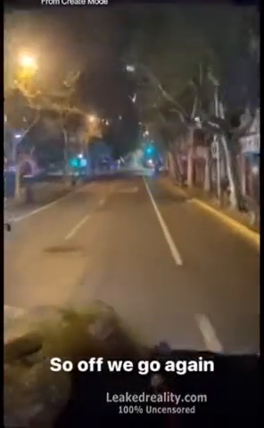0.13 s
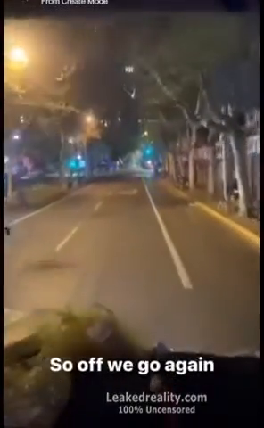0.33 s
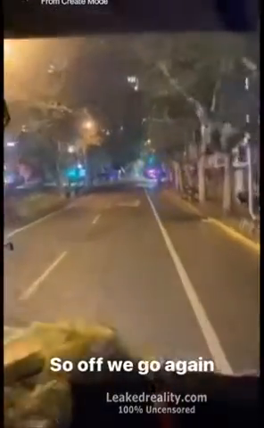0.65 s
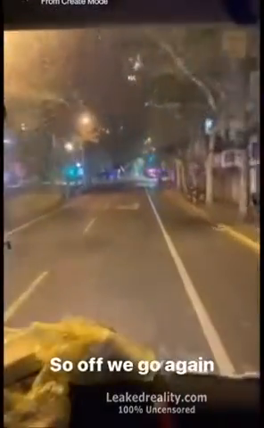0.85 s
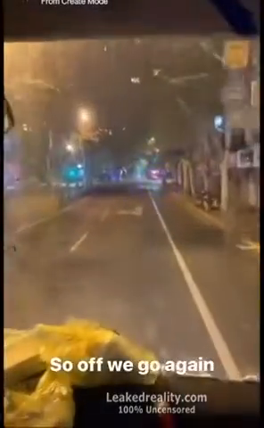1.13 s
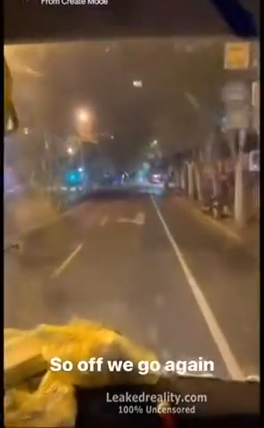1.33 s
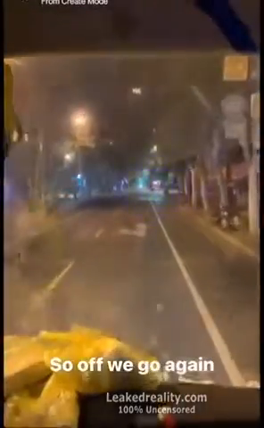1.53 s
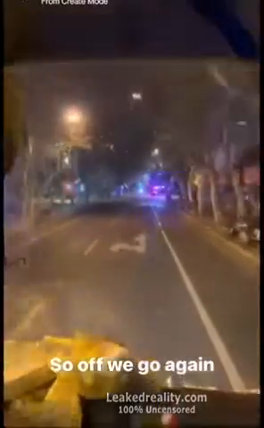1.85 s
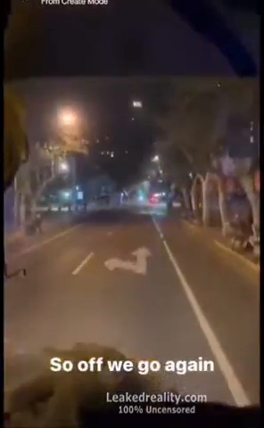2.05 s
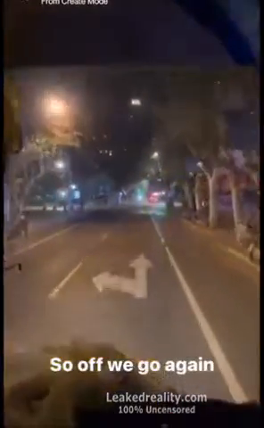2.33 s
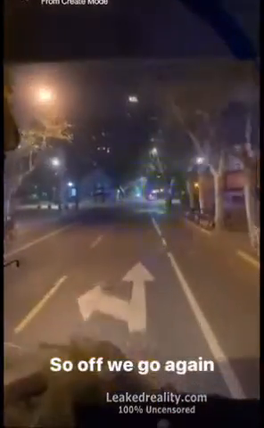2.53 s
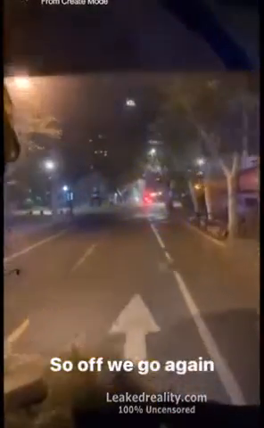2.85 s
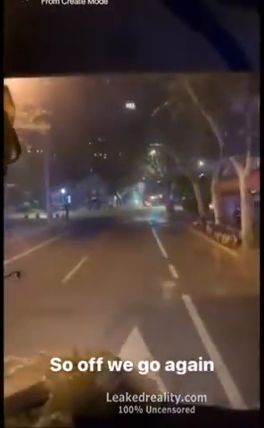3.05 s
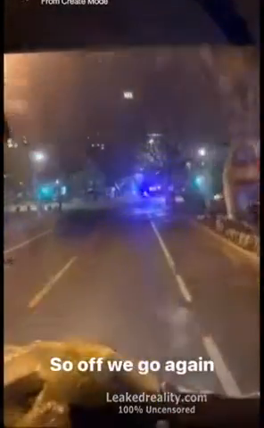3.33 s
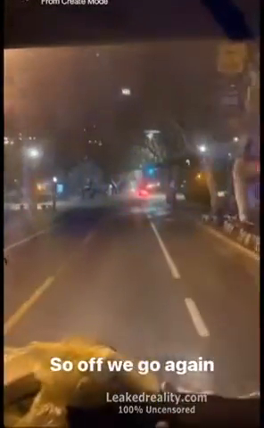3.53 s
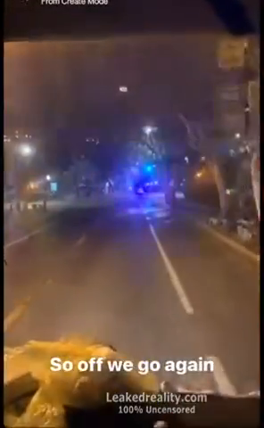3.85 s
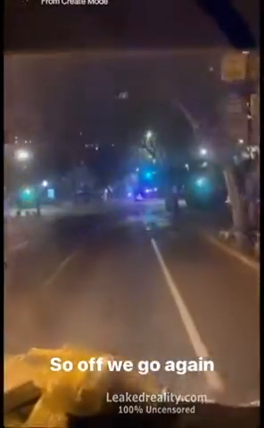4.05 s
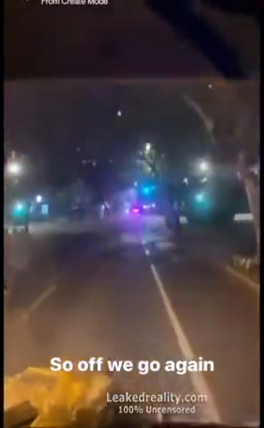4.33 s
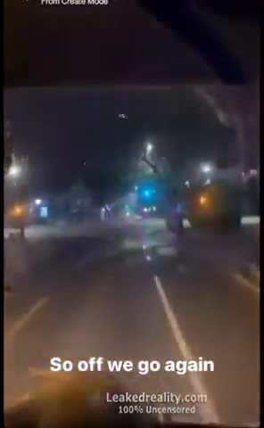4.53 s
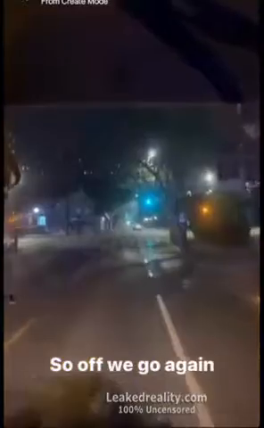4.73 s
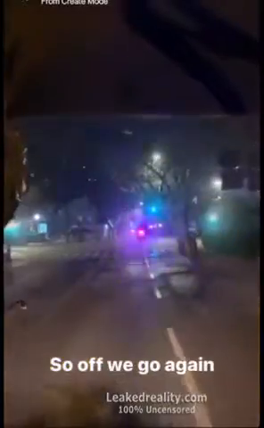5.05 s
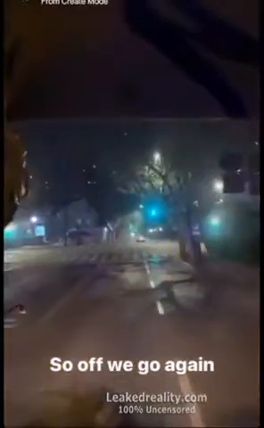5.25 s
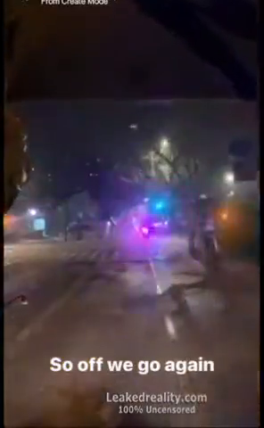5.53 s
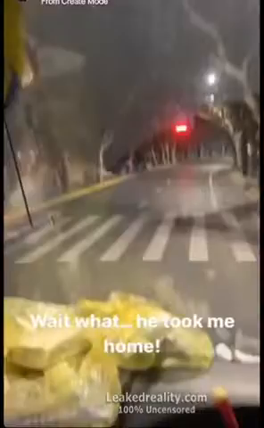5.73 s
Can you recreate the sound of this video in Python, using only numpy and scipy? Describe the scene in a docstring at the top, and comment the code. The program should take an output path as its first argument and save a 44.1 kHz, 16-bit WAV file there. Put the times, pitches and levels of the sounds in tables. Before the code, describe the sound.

A bus engine drones low under load, then eases off into steady road rumble, with loose panels chattering and sharp knocks inside.

```python
"""Inside a bus on a city street at night. At first the engine drones under load while the road rumbles
and fittings knock; then it eases off, and thin squeaks follow. Midway come more knocks and a swell of hum.
Booming bumps, a chattering panel, a wavering soft hiss and spurts of air run on until an abrupt stop.
Engine and hum are sine tones with noise-fed cabin resonances; road, hiss and air are coloured noise;
panels and fittings are struck or shaken resonances; squeaks are gliding partials.
"""
import sys
import numpy as np
from scipy import signal
from scipy.fft import rfft, irfft
from scipy.io import wavfile
from scipy.ndimage import uniform_filter1d

SR = 44100
rng = np.random.default_rng(int(sys.argv[2]) if len(sys.argv) > 2 else 0)


def transcribe(u):
    """Save the signal u as a 16-bit wav file named by the first command-line argument.

    u: samples, shape (n,) or (channels, n), limited to [-1, 1]; the rate is SR.
    q: integer samples, one column per channel.
    """
    v = np.clip(np.atleast_2d(u).T, -1, 1)
    q = np.round(v * 32767).astype(np.int16)
    wavfile.write(sys.argv[1], SR, q)


N = 260190
TIME = np.arange(N) / SR  # [s]

# Table levels are starting points: the sources add their own trims and wavering.
# Balance of the first four multiples of the firing rate: (level [dB])
ENGINE_ORDERS = [2, -27, -28, -31]
# Cabin resonances that growl with the engine: (frequency [Hz], width [Hz], level [dB])
CABIN_MODES = [(150.4, 11, 0), (179, 27, -2), (222, 14, 0), (253.6, 23, -4), (293, 14.4, -3),
               (326.6, 30, -10), (410, 27, -11), (449.4, 12, -4.5), (588, 42, -15.5)]
# Balance of the first four multiples of the hum's pitch: (level [dB])
HUM_ORDERS = [2, -5, -10, -18]
# Swell of the drive line's hum: (time [s], level [dB])
HUM_LEVEL = [(0, -38.5), (1.2, -42.5), (2.6, -51), (2.95, -33.5), (3.35, -39.5), (3.8, -46), (4.7, -46.5),
             (5.64, -41.5)]
# Roughness of the road, heard as tyre rumble: (time [s], level [dB])
ROAD_LEVEL = [(0.0, -31.5), (0.36, -32), (0.86, -35.5), (1.68, -31.5), (1.78, -36), (1.92, -31.5),
              (2.46, -36), (2.52, -37.5), (2.72, -32.5), (3.86, -33), (4.02, -32), (4.75, -36),
              (5.2, -34.5), (5.35, -34), (5.64, -34)]
# Shaking of the body panels: (time [s], level [dB])
SHAKING_LEVEL = [(0.0, -42), (0.54, -42.5), (0.6, -48.5), (0.66, -47), (1.26, -54), (1.62, -51),
                 (1.98, -52), (2.1, -53.5), (3.3, -51), (4.44, -52), (4.92, -49), (5.04, -53), (5.64, -51)]
# Relative spectra of sway, tyre rumble and body roar: (frequency [Hz], density [dB per Hz])
SWAY_COLOUR = [(10, -19.5), (17, -15), (24.5, 9), (32, -5), (43, -3.5), (55, -8), (80, -32)]
ROAD_COLOUR = [(35, -12.5), (55, -6.5), (70, 2.5), (100, -1.5), (150, -8), (200, -15), (260, -17),
               (350, -23), (600, -45)]
ROAR_COLOUR = [(100, -43.5), (200, 6), (300, 7.5), (450, 1), (540, 1), (900, -0.5), (1400, -6.5),
               (1800, -4.5), (2150, -14), (2800, -29.5), (5000, -63.5)]
# Bumps under the wheels:
# (time [s], length [s], boom level [dB], boom frequency [Hz], shudder level [dB])
BUMPS = [(.32, 0.034, -37, 84, -36), (0.625, 0.06, -28.5, 96, -35.5), (.975, 0.031, -36, 163, -42.5),
         (1.01, .04, -31.5, 90, -58), (2.731, 0.063, -36.5, 161, -44), (2.949, 0.057, -28.5, 45.5, -58),
         (3.272, 0.049, -22, 41.05, -55), (3.36, 0.15, -42, 130, -42), (4.051, 0.036, -35, 142.5, -52.5),
         (4.161, 0.08, -30.5, 82.2, -52), (4.412, 0.065, -23, 37.3, -63.5),
         (4.69, 0.045, -31.5, 102, -40.5)]
# Relative spectrum of the cabin's shudder: (frequency [Hz], density [dB per Hz])
SHUDDER_COLOUR = [(120, 2.5), (160, 1.5), (300, -1), (450, -11), (700, -24)]
# Chatters of loose panels:
# (time [s], length [s], rattle level [dB], ring level [dB], ring frequency [Hz], ring width [Hz])
CHATTERS = [(.138, 0.016, -45, -42, 1790, 200), (.2, 0.029, -54, -49, 1750, 250),
            (0.26, 0.032, -58, -41.5, 1160, 250), (0.533, 0.017, -48, -49, 1710, 250),
            (.69, 0.039, -56, -51, 760, 300), (1.012, 0.069, -51, -48.5, 1320, 350),
            (1.425, 0.018, -49.5, -49, 1840, 200), (1.492, 0.038, -52, -49, 1230, 500),
            (1.558, 0.015, -47.5, -36, 1825, 90.5), (1.582, .008, -63, -43, 1820, 120),
            (1.614, 0.04, -53, -49.5, 1790, 200), (1.978, 0.012, -46, -46.5, 1870, 150),
            (2.146, 0.023, -53.5, -58, 2870, 900), (2.37, 0.037, -54, -56, 1840, 200),
            (2.774, 0.024, -51, -43, 1855, 100), (2.92, 0.0093, -61, -49, 1880, 150),
            (3.119, 0.0083, -55, -50, 1800, 200), (3.333, 0.025, -47.5, -55, 1857, 250),
            (3.366, 0.025, -48, -51, 1580, 400), (3.417, 0.019, -46, -44.5, 1650, 400),
            (3.439, 0.0081, -53, -44, 1200, 200), (3.48, .012, -54, -49, 1810, 120),
            (3.632, 0.013, -50, -45.5, 1817, 200), (3.676, 0.048, -56, -46, 1860, 100),
            (3.739, 0.016, -49, -50, 1790, 150), (3.911, 0.014, -65, -44.5, 1850, 170),
            (3.975, 0.029, -51.5, -53, 1830, 150), (4.012, 0.026, -50, -43, 1780, 340),
            (4.018, 0.035, -64, -49, 850, 400), (4.088, 0.014, -45, -43, 1837, 160),
            (4.2, 0.038, -52, -46.5, 1700, 298), (4.315, 0.014, -45.5, -51.5, 1840, 150),
            (4.63, 0.026, -53, -51, 1140, 200), (4.657, 0.016, -42.5, -41.5, 1880, 320),
            (4.665, 0.014, -57, -50, 1110, 400), (4.718, 0.014, -47, -42, 1870, 280),
            (4.739, 0.018, -47.5, -48.5, 2030, 251), (4.802, 0.02, -47, -45, 1880, 199),
            (4.827, 0.014, -51, -55, 994, 500), (4.889, 0.023, -48, -41, 1887, 110),
            (4.964, 0.0083, -62, -49, 1764, 400), (5.125, .01, -54, -52, 1510, 410),
            (5.294, 0.014, -53, -49.5, 2020, 353), (5.364, 0.013, -54, -47, 1874, 110)]
# Resonances of the panels: (frequency [Hz], width [Hz], level [dB])
PANEL_MODES = [(760, 110, 3), (967, 27, 4.5), (1110, 180, -2.5), (1365, 300, 1.5), (1675, 116, 4),
               (1857, 48, 7.5), (2030, 40, -4.5), (2360, 75, -8), (3530, 470, -14), (4110, 300, -15)]
# Knocks of a fitting: (time [s], clack level [dB], low body level [dB])
KNOCKS = [(0.261, -41, -69), (.508, -37, -62), (2.306, -31.5, -58.5), (2.308, -36.5, -35.5),
          (2.312, -35, -30), (2.316, -43, -36), (2.322, -43, -32)]
# Resonances of the fitting: (frequency [Hz], width [Hz], level [dB])
FITTING_MODES = [(320, 34, -2), (420, 24, 3.5), (600, 81, -12), (780, 38, -2), (1240, 66, -4),
                 (1880, 55, 1.5), (2350, 70, -12.5)]
# Relative spectrum of the knocks: (frequency [Hz], density [dB per Hz])
KNOCK_COLOUR = [(150, 15), (350, 18.5), (800, 8.5), (1400, 18), (2000, 9.5), (2700, -2), (4600, -2.5),
                (6200, 0.5), (8100, -4.5), (9500, -12.5), (12000, -11.5), (15500, -25.5)]
# Spurts of air: (time [s], length [s], jet level [dB], whistle level [dB])
SPURTS = [(0.293, 0.028, -52, -65), (0.506, .02, -58, -51), (1.626, 0.014, -68, -56),
          (1.993, 0.026, -56, -79), (2.147, .025, -67, -60), (3.872, 0.012, -55, -63),
          (3.886, 0.017, -48, -48.5), (3.906, 0.031, -47, -50), (4.493, 0.013, -43, -45),
          (4.508, 0.014, -53.5, -55), (4.528, 0.039, -44.5, -45.5), (4.594, 0.014, -56, -64),
          (5.305, 0.02, -55.5, -71)]
# Whistles of the air outlet: (frequency [Hz], width [Hz], level [dB])
WHISTLE_MODES = [(4580, 53, -6), (5035, 23, 4.5), (5310, 65, -2), (5590, 55, -5.5), (5800, 55, -7),
                 (6150, 95, -5), (6720, 59, -5), (6900, 55, -8), (7760, 75, -8.5), (9200, 110, -11)]
# Relative spectrum of the air jet: (frequency [Hz], density [dB per Hz])
AIR_COLOUR = [(800, -1), (1600, 7.5), (3200, -4), (4400, -2), (5200, -0.5), (6500, -2), (9000, 2),
              (10500, -3), (13300, 2.5), (15500, -21)]
# Squeaks of the trim: (time [s], length [s], nominal pitch [Hz], level [dB],
# fall per overtone [dB], glide [share of the pitch])
SQUEAKS = [(0.945, 0.032, 5190, -57, -30, -.02), (1.213, 0.04, 5110, -52, -30, -0.045),
           (1.264, 0.073, 1232, -53, -4, 0), (1.31, 0.065, 1220, -60, -6, 0)]
# Swell of the treble hiss: (time [s], level [dB])
HISS_LEVEL = [(0.0, -51.5), (0.22, -57), (0.3, -51), (0.58, -61.5), (0.8, -53), (1.42, -63), (1.6, -56.5),
              (2.1, -66), (2.3, -58.5), (2.62, -62.5), (2.68, -56.5), (2.77, -66), (2.82, -57), (2.94, -55),
              (3.0, -59.5), (3.26, -58.5), (3.42, -50.5), (3.52, -62), (3.6, -57), (3.76, -55),
              (3.84, -62.5), (4.0, -56.5), (4.06, -58), (4.33, -59), (4.38, -56.5), (4.44, -61.5),
              (4.52, -62), (4.78, -54.5), (4.82, -62), (4.88, -55.5), (5.04, -66), (5.14, -58.5),
              (5.26, -62), (5.34, -60.5), (5.42, -64.5), (5.48, -57), (5.64, -57)]
# Relative spectrum of the hiss, also used for the panel's fizz: (frequency [Hz], density [dB per Hz])
HISS_COLOUR = [(1200, 0.5), (2300, 1.5), (3100, 0), (4200, 2), (5800, 2), (8000, -1), (10000, -4.5),
               (12300, -6.5), (13500, -14.5), (15500, -24)]

# The engine pulls, then eases off to a cruise around the same firing rate.
FIRING_HZ, FIRING_WANDER = 39.83, 0.031  # wander as a share of the rate
PULL_UNTIL_S, EASE_OFF_S = 0.64, 0.17
DRONE_DB, DRONE_LOAD_DB = -35.5, 14  # cruising level, rise under full load
GROWL_DB, GROWL_LOAD_DB = -52, 15
GROWL_FOLLOWS = 0.65  # share of the road's swings that reaches the cabin resonances
HUM_HZ = 73.4
SWAY_DB = -29
BUMP_RISE_S, BUMP_T60_S = 0.019, 0.43
CHATTER_RISE_S, RATTLE_T60_S, RING_T60_S = 0.008, 0.16, 0.072
SQUEAK_LOWEST_HZ = 3300
END_S, CUTOFF_HZ = 5.671, 15600


def engine(growl_lag_s=0.16, throb_db=2.0):
    """Firings boom in the cabin; its resonances growl in time with them and settle last after the pull."""
    phase = phase_of(FIRING_HZ * (1 + FIRING_WANDER * drift(11.3)))
    drone = rms_one(sum(multiples(phase, ENGINE_ORDERS)))
    drone *= from_db(DRONE_DB + DRONE_LOAD_DB * load())
    firings = rng.standard_normal(N) * from_db(throb_db * np.cos(phase))
    growl_db = GROWL_DB + GROWL_LOAD_DB * load(growl_lag_s) + GROWL_FOLLOWS * road_swing()
    return drone + from_db(growl_db) * steady(resonate(firings, CABIN_MODES), 0.2)


def load(lag_s=0):
    """Effort of the engine, felt after a lag: 1 while it pulls, then dying away to 0."""
    return np.exp(-np.maximum(TIME - lag_s - PULL_UNTIL_S, 0) / EASE_OFF_S)


def hum(wander=0.01405, waver_db=3.0):
    """The drive line hums in clean tones that each swell and fade."""
    phase = phase_of(HUM_HZ * (1 + wander * drift(2.64)))
    tones = sum(from_db(waver_db * drift(4)) * tone for tone in multiples(phase, HUM_ORDERS))
    return from_db(in_time(HUM_LEVEL)[0]) * rms_one(tones)


def road(rumble_db=-2.0, lumps_db=1.4, flutter_db=1.5, flutter_rate=45):
    """The suspension sways, the tyres rumble in uneven lumps and the body roars with a coarse flutter."""
    sway = from_db(SWAY_DB) * steady(noise(SWAY_COLOUR), 0.3)
    rumble_level = in_time(ROAD_LEVEL)[0] + rumble_db + lumps_db * drift(9.2)
    rumble = from_db(rumble_level) * steady(noise(ROAD_COLOUR), 0.1)
    fluttering = from_db(flutter_db * drift(flutter_rate)) * noise(ROAR_COLOUR)
    return sway + rumble + from_db(shaking_db()) * rms_one(fluttering)


def road_swing():
    """How much rougher than its average the road is, in dB."""
    road_db = in_time(ROAD_LEVEL)[0]
    return road_db - road_db.mean()


def shaking_db(level_db=1.5):
    """How hard the body shakes at each moment, in dB."""
    return in_time(SHAKING_LEVEL)[0] + level_db


def bumps(relative_width=0.32):
    """Each bump sets one low mode of the body booming and makes the cabin shudder."""
    shudder = steady(noise(SHUDDER_COLOUR), 0.033)
    out = np.zeros(N)
    for s, length, db, hz, shudder_db in BUMPS:
        envelope = burst(s, length, BUMP_RISE_S, BUMP_T60_S)
        out += from_db(db) * sing(envelope, hz, relative_width * hz, even_s=0.016)
        out += from_db(shudder_db) * envelope * shudder
    return out


def panel(tremble_db=-6.0, waver_db=2.0, grain_db=1.1, fizz_db=-14.0, strike_db=0.0, load_db=0.5,
          overtone_ratio=2.24, overtone_db=-21.5, body_db=-8.0, body_hz=860, body_width_hz=650):
    """Loose panels tremble with the body; chatters knock, tap, fizz, drum and make one mode sing out."""
    # the tremble is slightly stronger under load
    shaking = from_db(shaking_db() + tremble_db + load_db * load() + waver_db * drift(20))
    fine_taps = steady(resonate(contacts(per_s=1500, spread_db=2.0), PANEL_MODES), 0.02)
    coarse_taps = steady(resonate(contacts(per_s=450, spread_db=3.0), PANEL_MODES), 0.012)
    uneven = rms_one(from_db(grain_db * drift(140)))  # the edge touches harder and softer in turn
    rattle, ring, strikes = np.zeros((3, N))
    for s, length, rattle_db, ring_db, hz, width_hz in CHATTERS:
        rattle += from_db(rattle_db) * burst(s, length, CHATTER_RISE_S, RATTLE_T60_S)
        singing = from_db(ring_db) * burst(s, length, CHATTER_RISE_S, RING_T60_S)
        ring += sing(singing, hz, width_hz, even_s=0.004)
        overtone = sing(singing, overtone_ratio * hz, 2 * width_hz, even_s=0.0035)
        ring += from_db(overtone_db) * overtone
        strikes[int((s + CHATTER_RISE_S / 2) * SR)] = from_db(rattle_db + strike_db)
    single_strike = resonate(1.0 * (TIME == 0), PANEL_MODES)
    knock = resonate(strikes, PANEL_MODES) / np.abs(single_strike).max()
    fizz = from_db(fizz_db) * rattle * noise(HISS_COLOUR)
    drumming = from_db(body_db) * sing(rattle, body_hz, body_width_hz, even_s=0.01)
    return knock + ring + rattle * coarse_taps + uneven * (shaking * fine_taps + drumming + fizz)


def knocks(ring_db=2.5, thud_db=-7.5, top_db=-9.0, tail_db=-13.0, split_hz=2500,
           ping_db=-11.5, ping_hz=6200, ping_width_hz=1100):
    """Each knock is a bright clack and ping over the low ring of the fitting, with a short cabin tail."""
    clack = noise(KNOCK_COLOUR)
    top = rms_one(signal.sosfilt(signal.butter(2, split_hz, "high", fs=SR, output="sos"), clack))
    low = rms_one(signal.sosfilt(signal.butter(2, split_hz, "low", fs=SR, output="sos"), clack))
    out = np.zeros(N)
    for s, clack_db, body_db in KNOCKS:
        blow = np.zeros(N)
        blow[int(s * SR)] = 1
        ring = resonate(blow, FITTING_MODES)
        body = from_db(ring_db) * ring / np.abs(ring).max()
        body += from_db(thud_db) * low * burst(s, 0.004, rise=0.0019, t60=0.061)
        crack = burst(s, 0.0024, rise=0.0012, t60=0.05)
        crack += from_db(tail_db) * burst(s, 0.013, rise=0.0098, t60=0.32)
        ping_envelope = burst(s, 0.0024, rise=0.001, t60=0.047)
        ping = from_db(ping_db) * sing(ping_envelope, ping_hz, ping_width_hz, even_s=0.0018)
        out += from_db(body_db) * body + from_db(clack_db) * (from_db(top_db) * top * crack + ping)
    return out


def air(sputter_db=0.7, grain_db=-0.5, tail_db=-17.5):
    """Short spurts of air sputter and whistle at the outlet, and linger in the cabin."""
    jet = rms_one(noise(AIR_COLOUR) * from_db(sputter_db * drift(70) + grain_db * drift(700)))
    whistle = steady(resonate(rng.standard_normal(N), WHISTLE_MODES), 0.05)
    out = np.zeros(N)
    for s, length, db, whistle_db in SPURTS:
        direct = burst(s, length, rise=0.009, t60=0.19)
        tail = from_db(tail_db) * burst(s, length, rise=0.04, t60=0.23)
        out += np.hypot(direct, tail) * (from_db(db) * jet + from_db(whistle_db) * whistle)
    return out


def squeaks(arch=0.004, jitter=0.0052):
    """Trim sticks and slips in short arched chirps, of which only the high partials radiate."""
    out = np.zeros(N)
    waver = 1 + jitter * drift(120)
    flutter = [from_db(2 * drift(60)) for _ in range(4)]  # one per partial
    for s, length, hz, db, fall_db, glide in SQUEAKS:
        progress = np.clip((TIME - s) / length, 0, 1)
        swell = np.sin(np.pi * progress) ** 2
        bend = 1 + arch * (swell - 0.8) + glide * (progress - 0.5)
        phase = phase_of(hz * waver * bend)
        first = int(np.ceil(SQUEAK_LOWEST_HZ / hz))
        for k, strength in enumerate(flutter):
            partial = np.sqrt(2) * np.sin((first + k) * phase)
            out += from_db(db + k * fall_db) * strength * swell * partial
    return out


def hiss(level_db=1.5, flicker_db=1.6, split_hz=7000, top_swing=0.25, top_flicker_db=1.8):
    """A soft bright hiss that swells and fades, turning duller as it fades."""
    hiss_db = in_time(HISS_LEVEL)[0] + flicker_db * drift(24)
    bed = noise(HISS_COLOUR)
    low = signal.sosfiltfilt(signal.butter(2, split_hz, fs=SR, output="sos"), bed)
    top_db = top_swing * (hiss_db - hiss_db.mean()) + top_flicker_db * drift(7.0)
    return from_db(hiss_db + level_db) * (low + from_db(top_db) * (bed - low))


def from_db(db):
    """Decibels to gain."""
    return 10 ** (np.asarray(db) / 20)


def rms_one(x):
    """Scale to unit rms."""
    return x / np.sqrt(np.mean(x ** 2) + 1e-20)


def in_time(rows):
    """Each column of a curve at every sample."""
    s, *columns = np.transpose(rows)
    return [np.interp(TIME, s, c) for c in columns]


def phase_of(hz):
    """Running phase in radians of a changing frequency."""
    return 2 * np.pi * np.cumsum(hz) / SR


def multiples(phase, levels_db):
    """Sine tones at whole multiples of a pitch, each from a random starting phase."""
    return [from_db(db) * np.sin(k * phase + rng.uniform(0, 2 * np.pi))
            for k, db in enumerate(levels_db, 1)]


def noise(colour, echo_db=-6.0, cabin_t60=0.38):
    """Unit noise with the given spectrum, rippled by the short echoes of the cabin."""
    hz, db = np.transpose(colour)
    f = np.maximum(np.arange(N // 2 + 1) * SR / N, 1)
    skirts = np.minimum(f / hz[0], 1) ** 2 * np.minimum(hz[-1] / f, 1) ** 2
    gain = from_db(np.interp(np.log(f), np.log(hz), db)) * skirts
    echoes = rng.standard_normal(N) * from_db(-60 * np.minimum(TIME / cabin_t60, 3))
    # long waves fill the cabin evenly, so the ripple grows with frequency
    ripple = 1 + from_db(echo_db) * rfft(echoes) / np.linalg.norm(echoes) * f / (f + 500)
    return rms_one(irfft(rfft(rng.standard_normal(N)) * gain * ripple, N))


def drift(rate):
    """Random wavering of unit rms, mostly slower than the rate in Hz."""
    f = np.arange(N // 2 + 1) * SR / N
    return rms_one(irfft(rfft(rng.standard_normal(N)) / (1 + (f / rate) ** 2), N))


def steady(x, seconds):
    """Even out the swells of x that are slower than the given time."""
    size = max(int(seconds * SR), 4)
    power = uniform_filter1d(uniform_filter1d(x ** 2, size), size // 4)
    return x / np.sqrt(np.abs(power) + 1e-12)


def resonate(x, modes):
    """Parallel resonances of alternating sign."""
    out = 0
    for k, (hz, width, db) in enumerate(modes):
        r = np.exp(-np.pi * width / SR)
        poles = [1, -2 * r * np.cos(2 * np.pi * hz / SR), r * r]
        ringing = (1 - r * r) / 2 * signal.lfilter([1, 0, -1], poles, x + 1e-18)
        out = out + (-1) ** k * from_db(db) * ringing
    return out


def sing(envelope, hz, width_hz, even_s):
    """One randomly shaken mode sounds for as long as its envelope lasts."""
    out = np.zeros(N)
    during = envelope > 0
    mode = [(hz, width_hz, 0)]
    shaken = resonate(resonate(rng.standard_normal(during.sum()), mode), mode)
    out[during] = envelope[during] * steady(shaken, even_s)
    return out


def burst(start, length, rise, t60):
    """Envelope that rises within its length, holds, then dies away by 60 dB per t60; times in seconds."""
    envelope = np.zeros(N)
    during = slice(max(int(start * SR), 0), int((start + length + 2 * t60) * SR))
    age = TIME[during] - start
    decay = from_db(-60 * np.maximum(age - length, 0) / t60)
    envelope[during] = np.clip(age / rise, 0, 1) * decay
    return envelope


def contacts(per_s, spread_db):
    """Random tiny impacts of uneven strength."""
    hits = (rng.random(N) < per_s / SR) * rng.choice([-1, 1], N)
    return rms_one(hits * from_db(spread_db * rng.standard_normal(N)))


def scene():
    """Everything as heard near the windscreen, in one channel."""
    vehicle = engine() + hum() + road() + bumps()
    details = panel() + knocks() + air() + squeaks() + hiss()
    return (vehicle + details)[None]


def record(dry):
    """The sound stops abruptly and the top is cut."""
    running = np.clip((END_S - TIME) / 0.002, 0, 1)
    top_cut = signal.ellip(10, 0.1, 80, CUTOFF_HZ, fs=SR, output="sos")
    return signal.sosfilt(top_cut, dry * running + 1e-18)


dry = scene()
out = record(dry)
transcribe(out)
```